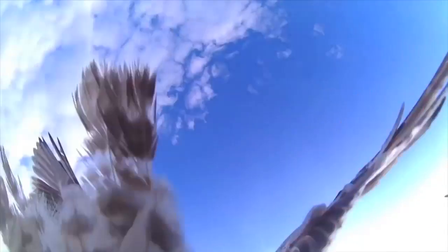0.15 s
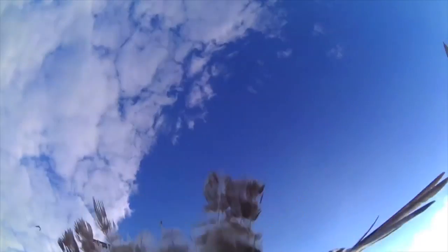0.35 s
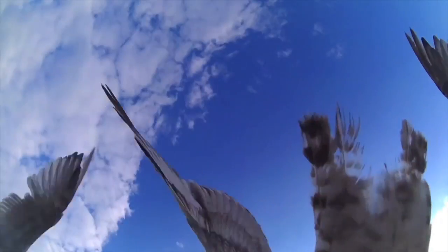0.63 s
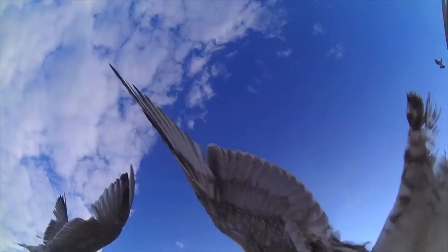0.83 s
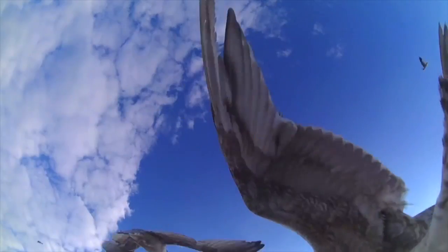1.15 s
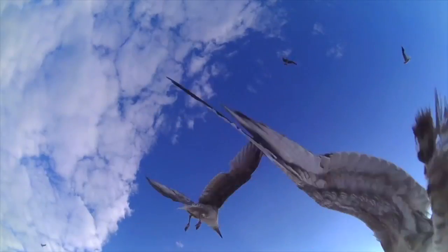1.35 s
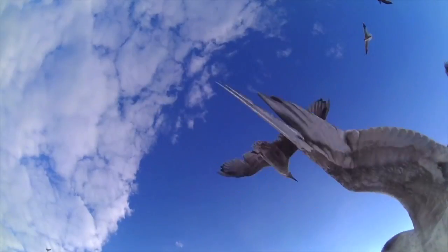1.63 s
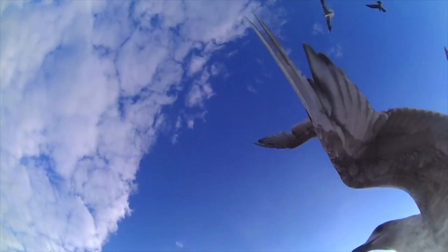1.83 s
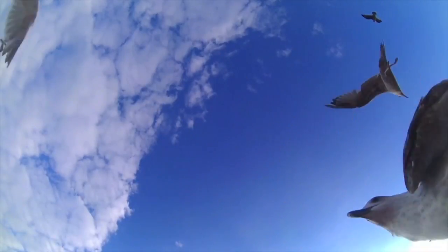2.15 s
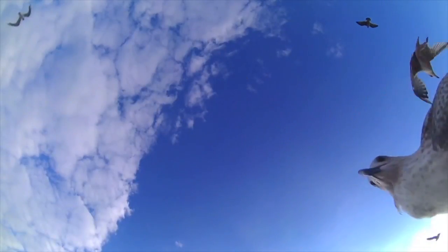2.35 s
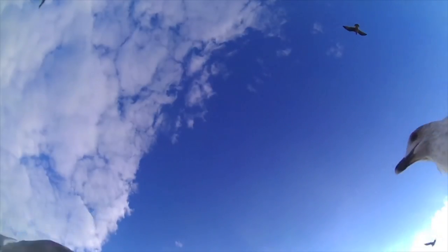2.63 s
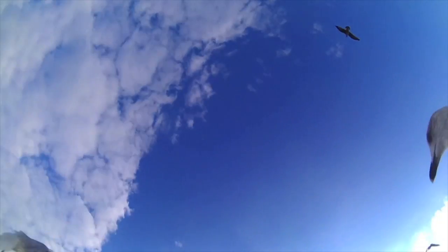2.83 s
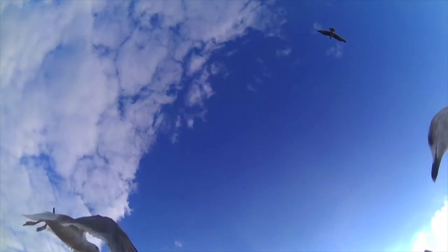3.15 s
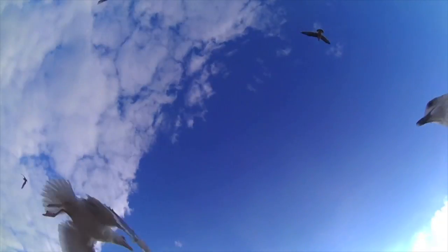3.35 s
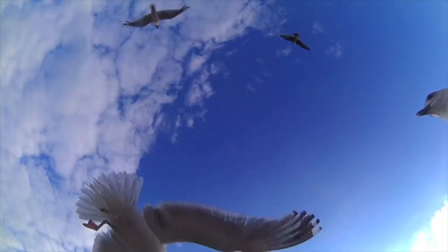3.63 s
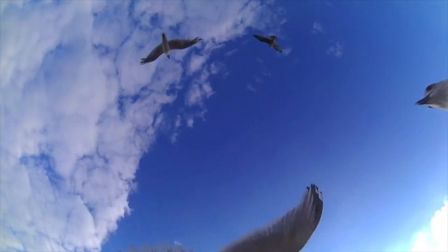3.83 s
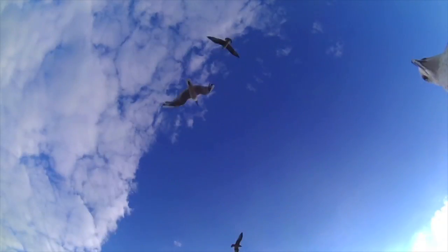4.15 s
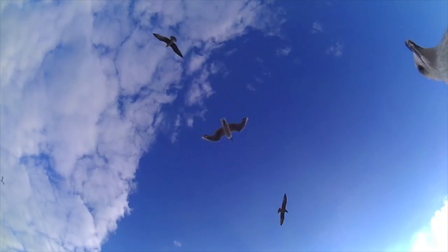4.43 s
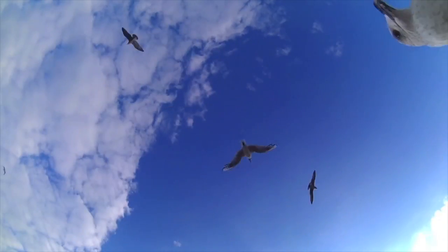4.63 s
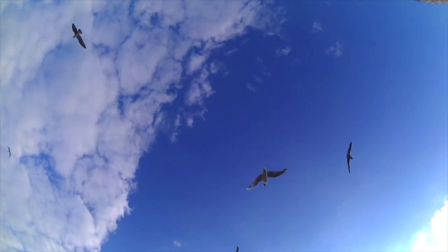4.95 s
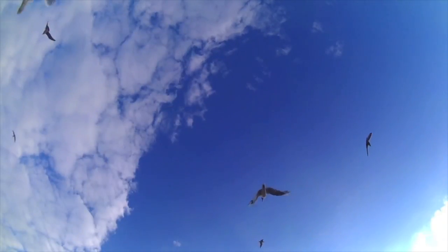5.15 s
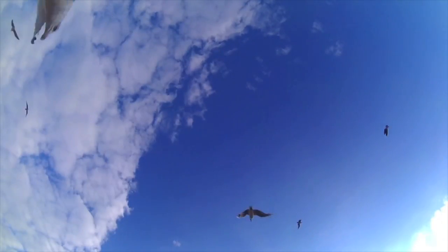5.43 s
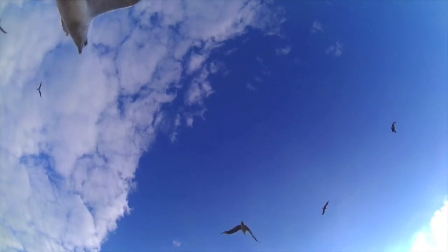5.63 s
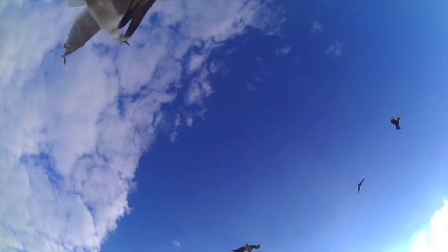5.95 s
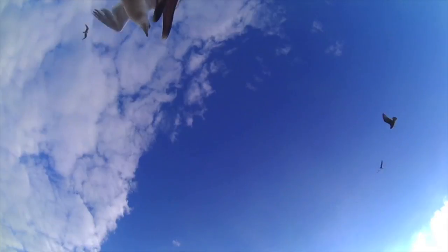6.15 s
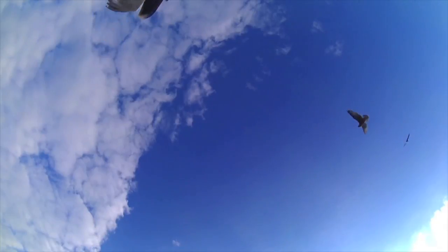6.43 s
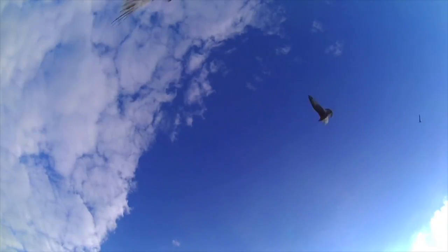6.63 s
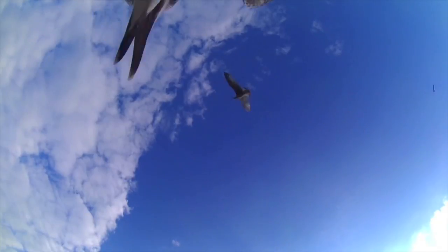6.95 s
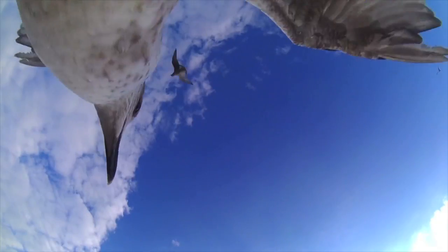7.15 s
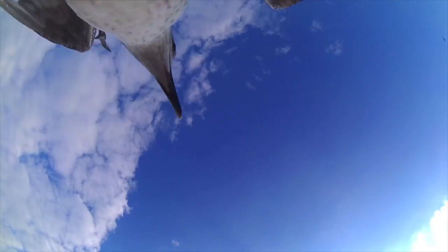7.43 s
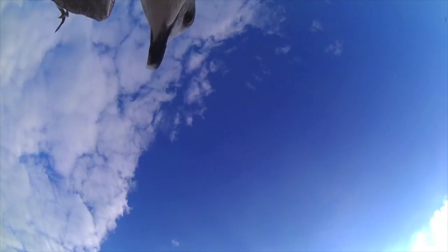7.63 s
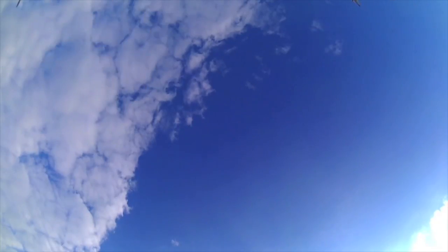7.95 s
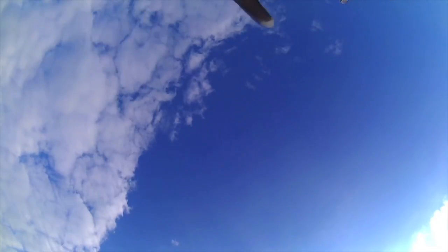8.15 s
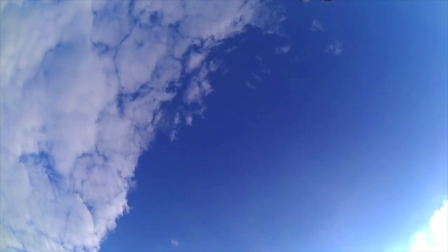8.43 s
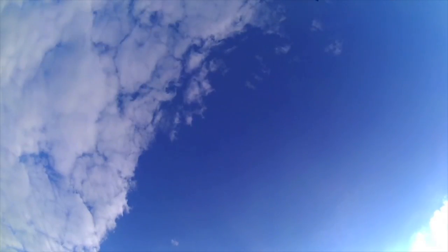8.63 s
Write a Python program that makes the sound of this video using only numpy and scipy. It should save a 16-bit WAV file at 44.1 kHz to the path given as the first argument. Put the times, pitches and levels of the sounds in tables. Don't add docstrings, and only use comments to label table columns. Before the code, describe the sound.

A closed housing picks up everything close and boxy: feet scraping, dull thumps, one loud dry crack early on. Gulls give shaky near-pure whistles that slide downward, scattered faint notes, and midway a shrill scream running into yelps and a throaty rattle. Low gusty wind and distant rumble continue throughout, with thin electronic hiss and a high whirr that briefly cuts out. Open air, only a very short haze after calls.

```python
import sys
import numpy as np
from scipy import signal
from scipy.fft import rfft, irfft
from scipy.io import wavfile
from scipy.ndimage import uniform_filter1d

SR = 44100
rng = np.random.default_rng(int(sys.argv[2]) if len(sys.argv) > 2 else 0)


def int16_out(signal):
    q = np.round(np.clip(np.atleast_2d(signal).T, -1, 1) * 32767)
    wavfile.write(sys.argv[1], SR, q.astype(np.int16))


def boost(x):
    u = np.asarray(x, float) / 20
    return 10 ** u


N = 387638


def evened(x):
    return x / np.sqrt(np.mean(x ** 2) + 1e-20)


def add(mix, start, sound):
    part = mix[max(round(start * SR), 0):][:len(sound)]
    part += sound[:len(part)]


def play(sources):
    mix = np.zeros(N)
    for source, table in sources:
        for row in table:
            add(mix, *source(*row))
    return mix


def slow(hz, size=N):
    width = max(round(SR / hz), 1)
    smooth = uniform_filter1d(rng.standard_normal(size), width)
    return evened(uniform_filter1d(smooth, width))


def noise(points):
    f, level = np.transpose(points)
    hz = np.fft.rfftfreq(N, 1 / SR)
    shape = boost(np.interp(np.log(hz + 1), np.log(f), level, left=-60, right=-90))
    return evened(irfft(rfft(rng.standard_normal(N)) * shape, N))


def housing(x, centre_hz, narrow_db, waver_db=0., modes=None):
    if modes is None:
        # [f/Hz, width/Hz, level/dB]
        modes = [(480, 384, 10.5), (820, 680, -10.5), (1292, 224, -3.5), (1800, 260, 3), (2294, 274, -14),
                 (3050, 380, -3), (4044, 580, -5.5), (5200, 200, -7), (6200, 680, -15), (8160, 4200, -8.5)]
    out = np.zeros(len(x))
    for hz, width, db in modes:
        mode = signal.iirpeak(hz, hz / width, SR)
        drive = x * boost(waver_db * np.log2(hz / 1100) * slow(80, size=len(x)))
        ringing = signal.lfilter(*mode, signal.lfilter(*mode, drive))
        out += boost(db - narrow_db * np.log2(hz / centre_hz) ** 2) * ringing
    return evened(out)


def whistle(rows, tremble_db=1.0):
    s, hz, db = np.transpose(rows)
    t = np.arange(s[0] - .003, s[-1] + 0.0028, 1 / SR)
    pitch = np.interp(t, s, hz) * (1 + .003 * slow(150, size=len(t)))
    level = np.interp(t, s, boost(db)) * boost(tremble_db * slow(89, size=len(t)))
    husk = 1 + .06 * slow(900, size=len(t))
    edge = np.clip(np.minimum(t - t[0], t[-1] - t) / 0.0048, 0, 1)
    phase = 2 * np.pi * np.cumsum(pitch) / SR
    octave = level * boost(24.0 - 180.0 * np.log2(2 * pitch / 6150) ** 2)
    return t[0], np.sqrt(2) * level * husk * edge * (np.sin(phase) + octave * np.sin(2 * phase))


def held(first_db, last_db, tune, tremble_db=0.3):
    # [f/Hz, level/dB]
    port = [(2850, -6), (3100, -16.5), (3420, -17.5), (3840, 2), (4150, -9), (4350, -10), (4600, -22)]
    s, hz = np.transpose(tune)
    t = np.arange(s[0], s[-1], .002)
    pitch = np.interp(t, s, hz)
    db = np.linspace(first_db, last_db, len(t)) + np.interp(pitch, *np.transpose(port))
    return whistle(np.transpose([t, pitch, db]), tremble_db)


def climb(start, length, db):
    # [share of its length, f/Hz]
    steps = [(0, 2840), (.1, 3280), (.2, 2955), (.28, 3390), (.56, 3420), (.62, 3660), (1, 3926)]
    side_hz, side_db = 480, -19
    tune = np.multiply(steps, (length, 1)) + (start, 0)
    begin, voice = held(db, db, tune, tremble_db=2.)
    side = held(db + side_db, db + side_db, tune + (0, side_hz), tremble_db=5.)[1]
    return begin, voice + side


def note(start, length, first_hz, last_hz, db, tremble_db=1.3):
    swell_db, die_db = 5., 6.
    peak_at = .35
    mid_hz = first_hz + peak_at * (last_hz - first_hz)
    rows = [(start, first_hz, db - swell_db),
            (start + peak_at * length, mid_hz, db),
            (start + length, last_hz, db - die_db)]
    return whistle(rows, tremble_db)


def wobble(*row):
    return note(*row, tremble_db=2.6)


def chatter(*row):
    return note(*row, tremble_db=4.5)


def squawk(start, length, hz, db, throat_hz, rough, narrow_db=10.0, waver_db=3.2, fade_db=0.,
           rise=.1, late=0., bow=.038, jitter=.008):
    # [f/Hz, width/Hz, level/dB]
    resonances = [(1292, 160, -4), (1890, 190, 4), (2250, 420, -1), (2950, 220, -2), (4080, 520, -5.5),
                  (5200, 600, -10), (6200, 680, -14)]
    size = round((length + 0.0071) * SR)
    u = np.arange(size) / (length * SR)
    arch = .0135 - bow / 4 - 0.011 * u + bow * u * (1 - u) - 0.044 * u ** 4 + late * (u - .5)
    shake = (jitter + 0.086 * rough) * slow(105, size=size)
    turns = np.cumsum(hz * (1 + arch + shake)) / SR
    sweep = .0012
    pulses = np.zeros(size)
    for k in range(int(950 / hz) + 1, int(6400 / hz) + 1):
        pulses += np.cos(2 * np.pi * k * turns - np.pi * sweep * (k * hz) ** 2 / 1000)
    weak = 0.023 * np.cos(np.pi * turns) * pulses
    puffs = (0.25 + np.exp(-(turns % 1) / 0.23)) * rng.standard_normal(size)
    share = np.clip(rough, 0, 1)
    drive = (1 - share) * evened(pulses + weak) + share * evened(puffs)
    effort = np.clip(np.minimum(u / rise, (1 - u) / .2), 0, 1)
    breath = drive * effort * boost(-fade_db * u)
    return start, boost(db) * housing(breath, throat_hz, narrow_db, waver_db, resonances)


def yelp(start, length, hz, db, rise):
    return squawk(start, length, hz, db, throat_hz=2400, rough=.09, waver_db=2.5,
                  rise=rise, late=.035, bow=.1, jitter=.004)


def rattle(start, length, hz, db, throat_hz):
    return squawk(start, length, hz, db, throat_hz, rough=.2, narrow_db=11., waver_db=2.,
                  fade_db=4., jitter=.002)


def chirp(*row, rough, narrow_db=45., waver_db=1., fade_db=8.5):
    return squawk(*row, rough, narrow_db=narrow_db, waver_db=waver_db, fade_db=fade_db, late=.04)


def cluck(*row):
    return chirp(*row, rough=.03)


def cackle(*row):
    return chirp(*row, rough=.48, narrow_db=90., waver_db=4., fade_db=14.)


def scatter(x):
    echo_db, echo_t60 = -15, .09
    t = np.arange(round(echo_t60 * SR)) / SR
    tail = rng.standard_normal(len(t)) * boost(-60 * t / echo_t60)
    return x + boost(echo_db) * signal.oaconvolve(x, tail / np.linalg.norm(tail))[:N]


def whistling_birds():
    # [t/s, f/Hz, level/dB]
    scream = [
        (5.166, 3930, -55),
        (5.2, 4000, -59),
        (5.22, 4100, -43.5),
        (5.262, 3953, -33.5),
        (5.288, 3900, -33),
        (5.312, 3840, -40.5),
    ]
    # [t/s, length/s, effort/dB]
    climbs = [
        (0.348, 0.096, -49.5),
        (1.703, 0.1, -50),
        (3.44, .09, -49.5),
    ]
    # [first effort/dB, last effort/dB, [(t/s, f/Hz), ..]]
    long_whistles = [
        (-51, -46.5, [(1.794, 4400), (1.876, 4610), (1.89, 4550), (2.157, 4290), (2.205, 4210), (2.215, 3840), (2.341, 3740), (2.37, 3150)]),
        (-51.5, -51.5, [(3.704, 4560), (3.787, 4400), (3.933, 4325), (3.973, 4280), (3.997, 3730), (4.029, 3710), (4.062, 3200)]),
        (-49, -63, [(7.232, 4470), (7.28, 4450), (7.4, 4230), (7.561, 4200), (7.582, 4170), (7.601, 3790), (7.71, 3590)]),
        (-54.5, -57.5, [(7.138, 4220), (7.17, 3770), (7.192, 3710), (7.218, 3730), (7.232, 3908)]),
    ]
    # [t/s, length/s, first f/Hz, last f/Hz, peak level/dB]
    far_notes = [(2.349, 0.19, 3040, 3100, -72), (2.712, .095, 3725, 3730, -65), (3., .17, 4400, 4230, -80),
                 (3.53, 0.024, 4500, 4586, -61), (3.563, 0.04, 5340, 5230, -51.5),
                 (3.657, 0.038, 5211, 5157, -58), (4.443, 0.014, 2830, 2850, -66),
                 (4.472, .03, 3300, 3450, -66), (4.483, 0.057, 4000, 4320, -65.5),
                 (4.488, 0.055, 3080, 3270, -69), (4.61, 0.12, 5480, 5330, -73),
                 (4.755, 0.05, 5400, 5290, -69), (4.81, .06, 5050, 4780, -74),
                 (4.82, 0.045, 3080, 2990, -71), (4.88, .032, 4134, 3900, -62.5),
                 (4.929, 0.023, 3875, 3865, -57.5), (8.11, 0.16, 4340, 3850, -78),
                 (8.765, .025, 2950, 3100, -63.5)]
    near_notes = [(4.964, 0.27, 4510, 4360, -69.5), (5.11, 0.017, 3008, 3077, -33.5),
                  (5.127, 0.044, 4000, 4130, -58.5), (5.15, 0.045, 3020, 3180, -60),
                  (5.136, 0.03, 3746, 3789, -55), (5.163, 0.078, 4260, 4330, -53.5),
                  (5.2, .032, 3273, 3580, -60), (5.309, 0.02, 3310, 3150, -41),
                  (5.332, 0.03, 3210, 3229, -42), (5.362, 0.062, 3230, 3120, -49),
                  (5.305, 0.042, 2780, 2660, -61.5), (5.306, 0.022, 5950, 5900, -54),
                  (5.328, 0.012, 4700, 4850, -60), (5.323, 0.085, 3680, 3600, -59.5),
                  (5.435, 0.057, 2799, 2713, -59.5)]
    broken_notes = [(0.158, 0.02, 1790, 1880, -57.5), (.16, .016, 3600, 3720, -64),
                    (.03, .012, 1300, 1290, -54), (.315, .025, 4100, 4000, -67),
                    (.445, 0.022, 4480, 4620, -65), (0.473, .034, 5200, 5200, -63),
                    (.475, 0.028, 4480, 4450, -63), (0.53, .022, 3800, 3850, -56),
                    (.505, .02, 3950, 3850, -63), (.517, .05, 5135, 4840, -67),
                    (0.522, .012, 3350, 3300, -60), (.545, .015, 3380, 3370, -64),
                    (0.582, 0.016, 2350, 2250, -58), (.565, 0.052, 4400, 4285, -56),
                    (0.568, 0.032, 3692, 3682, -60), (0.648, 0.021, 2920, 2880, -52),
                    (0.667, 0.048, 4100, 3830, -47), (0.713, 0.04, 4860, 4790, -65),
                    (.748, 0.048, 4425, 4350, -64), (0.767, .025, 3600, 3650, -56),
                    (.787, .013, 4760, 4800, -59), (0.806, 0.036, 4400, 4230, -52),
                    (0.824, .02, 2750, 2650, -60), (.89, 0.025, 3550, 3680, -66),
                    (.885, .02, 4300, 4550, -63), (.81, .02, 5400, 5600, -66), (.86, .04, 5300, 5400, -69),
                    (.755, .012, 4000, 3600, -62), (.785, .012, 3800, 4200, -61),
                    (.815, .012, 3500, 3480, -62), (0.969, .013, 2620, 2500, -56),
                    (.95, .018, 2800, 2780, -64), (0.967, 0.022, 1860, 1830, -50),
                    (1.004, 0.025, 1780, 1790, -47.5), (1.02, 0.067, 4080, 3875, -68),
                    (.53, .015, 1300, 1290, -60), (.57, .02, 1260, 1250, -62), (.9, .025, 2650, 2800, -62),
              (.855, .012, 2500, 2520, -58), (1.09, .04, 4150, 4000, -70), (4.49, .035, 4650, 4750, -71),
              (4.525, .04, 5950, 5980, -69), (4.555, .025, 5450, 5600, -71), (4.53, .09, 3620, 3480, -72),
              (4.68, .075, 3000, 2970, -72), (4.715, .04, 4700, 4600, -73), (4.795, .015, 3750, 3780, -65),
              (4.855, .035, 3600, 3480, -72), (4.865, .025, 2920, 2970, -65), (4.89, .035, 3150, 3300, -69),
              (5.098, .012, 7500, 8200, -62), (5.14, .05, 7550, 7500, -70), (5.16, .05, 3550, 3620, -63),
              (5.16, .04, 4550, 4500, -64), (5.24, .06, 3380, 3300, -62), (5.385, .025, 6350, 6300, -66),
              (5.39, .022, 5900, 5880, -63), (5.385, .03, 2750, 2720, -65), (5.42, .013, 3800, 3780, -61),
              (7.105, .009, 3950, 4000, -59), (7.112, .025, 4850, 5050, -68),
              (8.175, .018, 3380, 3350, -73), (8.24, .03, 4000, 4100, -74), (5.345, .02, 6420, 6350, -60)]
    return play([(whistle, [[scream]]), (climb, climbs), (held, long_whistles), (note, far_notes),
                 (wobble, near_notes), (chatter, broken_notes)])


def squawking_birds():
    # [t/s, length/s, f/Hz, level/dB, share of length spent rising]
    yelps = [
        (5.478, 0.024, 678, -41, .45),
        (5.509, 0.035, 1332, -36.5, 0.11),
        (5.551, 0.042, 1290, -36.5, .15),
        (5.598, 0.038, 1238, -35, 0.09),
    ]
    # [t/s, length/s, f/Hz, level/dB, throat f/Hz]
    rattles = [
        (5.651, 0.04, 276.7, -34, 2450),
        (5.694, 0.038, 265, -33, 2500),
        (5.737, 0.042, 264, -36, 2550),
        (5.786, 0.036, 259.7, -39, 2300),
        (5.837, .021, 261, -45, 2200),
    ]
    clucks = [
        (0.596, 0.017, 2040, -43.5, 2930),
        (0.615, 0.027, 371, -50.5, 1960),
        (0.61, 0.038, 371.3, -46, 3950),
    ]
    cackles = [
        (0.8, 0.015, 302, -56, 4100),
        (0.843, 0.045, 288, -54, 1850),
        (0.867, 0.02, 271, -50, 4100),
        (0.926, 0.025, 276, -50, 4050),
        (0.93, 0.026, 304, -46, 1800),
        (0.987, .025, 343, -51, 4100),
        (0.99, 0.017, 320, -53, 2450),
    ]
    return play([(yelp, yelps), (rattle, rattles), (cluck, clucks), (cackle, cackles)])


def knock(start, db):
    t = np.arange(round(0.034 * SR)) / SR
    crack = rng.standard_normal(len(t)) * np.clip(t / .0003, 0, 1) * boost(-60 * (t / .0058) ** 2)
    band = signal.butter(9, (1150, 10200), "band", fs=SR, output="sos")
    blow = signal.sosfilt(band, evened(crack) + boost(-5) * housing(crack, 2600, narrow_db=1.5))
    return start, boost(db) * blow / abs(blow).max()


def tap(start, db, centre_hz, top_hz):
    t = np.arange(round(.03 * SR)) / SR
    grit = .15 * rng.standard_normal(len(t)) * boost(-60 * t / .012)
    click = (t == 0) + grit
    blunt = signal.sosfilt(signal.butter(6, top_hz, fs=SR, output="sos"), click)
    ringing = housing(blunt, centre_hz, narrow_db=10.) * boost(-60 * t / .03)
    return start, boost(db) * ringing / abs(ringing).max()


def contact(start, db, rise_ms, t60, centre_hz):
    t = np.arange(round(.2 * SR)) / SR
    grit = rng.standard_normal(len(t)) * boost(1.3 * slow(270, size=len(t)))
    fall = boost(-60 * np.maximum(t - rise_ms / 1000, 0) / t60)
    shape = np.clip(1000 * t / rise_ms, 0, 1) * fall
    ringing = housing(grit * shape, centre_hz, narrow_db=16.0)
    fade_out = signal.windows.tukey(2 * len(t), .3)[len(t):]
    return start, boost(db) * ringing * np.sqrt(np.mean(shape ** 2)) * fade_out


def thump(start, db, ring):
    t = np.arange(round(.08 * SR)) / SR
    shape = (1 - np.exp(-t / 0.0016)) * boost(-60 * (t / ring) ** 2)
    return start, boost(db + 7.5) * shape * np.sin(2 * np.pi * 222 * t)


def blows():
    # [t/s, level/dB, rise/ms, t60/s, centre f/Hz]
    contacts = [(.001, -47, 2., 0.19, 1010), (2.515, -54, 12., 0.4, 760), (2.664, -42.5, 2.7, 0.054, 820),
                (5.189, -52, 66, 0.41, 840), (6.951, -43.5, 5.9, 0.61, 600), (6.976, -49, 1.6, 0.1, 5200),
                (7.002, -46, 3, .3, 1300), (6.981, -39.5, 4, 0.25, 950), (7.306, -45.5, 4.7, 0.082, 855),
                (7.816, -38, 1, 0.12, 800), (7.817, -49, 1, .3, 1850), (7.833, -53, 3.6, 0.3, 3300),
                (.716, -54, 4, .2, 900), (.85, -54, 4, .35, 950), (.002, -43, 2, .2, 350),
                (.003, -55, 2, .3, 4300), (.208, -57, 2, .12, 2200), (.228, -61, 2, .12, 4200),
                (.275, -62, 2, .1, 4300), (.8, -56, 4, .2, 1000), (.985, -55, 3, .15, 1300),
                (.94, -50, 2, .08, 900)]
    # [t/s, peak level/dB, ring/s]
    thumps = [
        (0.504, -30.5, .037),
        (0.804, -46, .037),
        (2.481, -42, .037),
        (2.666, -34, 0.041),
        (6.951, -36.5, 0.05),
        (6.987, -33, 0.043),
        (7.8184, -30.5, 0.038),
    ]
    # [t/s, peak level/dB, centre f/Hz, top f/Hz]
    taps = [(7.056, -39, 1450, 3000), (7.817, -35, 1700, 4600), (7.876, -32, 3000, 4400),
            (7.877, -41, 700, 2000), (7.891, -46, 2600, 4000), (7.929, -39, 1300, 3800),
            (7.616, -50, 5000, 5600), (8.08, -49, 4300, 5200), (4.93, -54, 4400, 5000),
            (7.041, -52, 4300, 5000), (.945, -36, 1500, 3000)]
    beak = (.8402, -14.3)  # s, peak dB
    return play([(knock, [beak]), (contact, contacts), (thump, thumps), (tap, taps)])


def wind():
    # [f/Hz, level/dB per Hz]
    boom_shape = [(70, -21), (105, -19), (135, -4.5), (170, -8.5), (230, 2.5), (260, -2), (320, -14.5),
                  (420, -31)]
    flutter_shape = [(250, -2), (370, 1.5), (430, 2.5), (520, -4), (650, -12), (1300, -19), (2500, -31.5),
                     (5000, -25.5)]
    rumble_shape = [(15, -23), (28, -4.5), (50, 3.5), (85, -4), (150, -10), (400, -38)]
    # [t/s, level/dB]
    calm = [(0, -29), (.1, -40), (.95, -43), (1.8, -49), (2.4, -48), (3.9, -56), (4.6, -48), (5.45, -54),
            (5.65, -46.5), (6.2, -50), (6.6, -45), (7.8, -51), (8.25, -54.5), (8.79, -54.5)]
    # [t/s, level/dB]
    sharpness = [(0, -12.5), (2.2, -17), (2.698, -12.5), (4., -22), (5.3, -10), (6.6, -19), (7.3, -10),
                 (8.79, -15.5)]
    # [start t/s, strength/dB, length/s]
    gusts = [(0.47, -37.5, 0.092), (0.774, -32, 0.084), (1.285, -40.5, 0.099), (1.87, -40.5, 0.096),
             (2.2, -38.4, 0.13), (2.472, -42, 0.065), (2.653, -44, 0.12), (3.041, -39.5, 0.061),
             (3.259, -38, 0.096), (3.457, -37, 0.14), (3.697, -40.9, 0.12), (3.933, -35.5, 0.092),
             (4.191, -37, 0.061), (4.397, -39, 0.11), (4.65, -38.5, 0.087), (4.788, -38, 0.08),
             (4.912, -35, 0.085), (5.188, -34, 0.15), (5.82, -39, 0.28), (6.3, -35.5, 0.099),
             (6.74, -36, 0.3), (7.218, -43.4, 0.039), (7.37, -36.5, 0.13), (7.61, -39.5, 0.082),
             (7.812, -40.5, 0.12), (8.056, -39, 0.093), (8.548, -42.5, 0.075)]
    shelter_db, gust_spread, rumble_db = -6, 0.42, -62.5
    t = np.arange(N) / SR
    calm_db = np.interp(t, *np.transpose(calm))
    sharp_db = np.interp(t, *np.transpose(sharpness))
    puffs = np.zeros(N)
    for start, db, length in gusts:
        swell = np.exp(-((t - start - length / 2) / (gust_spread * length)) ** 2)
        puffs += boost(2 * (db + shelter_db)) * swell
    gust_db = 10 * np.log10(boost(2 * calm_db) + puffs)
    lumps = slow(59)
    boom = evened(noise(boom_shape) * boost(0.56 * lumps))
    flutter = evened(noise(flutter_shape) * boost(.9 * lumps + 1.5 * slow(120)))
    flutter_db = 0.86 * (gust_db + 48.5) - 46 + sharp_db
    return boost(gust_db) * boom + boost(flutter_db) * flutter + boost(rumble_db) * noise(rumble_shape)


def electronics():
    # [f/Hz, level/dB per Hz]
    hiss_shape = [(400, 11.5), (900, 3), (2500, -4), (5000, -8), (10000, -10), (16000, -12)]
    # [f/Hz, width/Hz, level/dB]
    whirr_bands = [(6160, 1270, -5.5), (6783, 480, -5), (7630, 230, -2), (8280, 620, -7.5),
                   (10950, 450, -12), (11960, 620, -8), (13600, 300, -3), (14300, 1000, -9),
                   (15640, 430, -3)]
    # [t/s, length/s]
    pauses = [(0.272, 0.023), (1.197, 0.056), (1.839, 0.026), (2.238, 0.049), (2.771, 0.027),
              (3.072, 0.048), (3.711, 0.023), (4.008, 0.077), (4.306, 0.025), (4.71, 0.068), (4.977, 0.061),
              (6.013, 0.041), (6.213, 0.062), (6.74, 0.027), (7.045, 0.048), (7.309, 0.066), (7.84, 0.034),
              (8.31, 0.056)]
    save_lengths = [.131, .12, .11, 0.157, .026, 0.13, .13, .11, 0.064]
    save_first_s, save_every_s = 0.472, 1.001
    hiss_db, whirr_db, clock_db, clock_hz = -64.5, -67, -80.5, 13367
    t = np.arange(N) / SR
    hz = np.fft.rfftfreq(N, 1 / SR)
    bands = sum(boost(db) * np.exp(-(2 * (hz - f) / width) ** 2 / 2) for f, width, db in whirr_bands)
    whirr = evened(irfft(rfft(rng.standard_normal(N)) * bands, N))
    saves = [(save_first_s + k * save_every_s, length) for k, length in enumerate(save_lengths)]
    running = 1 - sum((t > s) & (t < s + length) for s, length in pauses + saves)
    gate = uniform_filter1d(running * 1., 200)
    throb = 1 + .13 * np.sin(2 * np.pi * 30. * t) + .17 * np.sin(2 * np.pi * 53.6 * t)
    clock = np.sin(2 * np.pi * np.cumsum(clock_hz + 6.7 * slow(30)) / SR)
    return boost(hiss_db) * noise(hiss_shape) + boost(clock_db) * clock + boost(whirr_db) * whirr * throb * gate


def scene():
    birds = scatter(whistling_birds() + squawking_birds())
    return (birds + blows() + wind() + electronics())[None]


def roll_off(x):
    return signal.sosfilt(signal.butter(12, 16480, fs=SR, output="sos"), x)


def record(dry):
    low_pass = signal.firwin(801, 15690, window=("kaiser", 8), fs=SR)
    limited = signal.oaconvolve(dry, low_pass[None], "same")
    return roll_off(limited)


dry = scene()
out = record(dry)
int16_out(out)
```